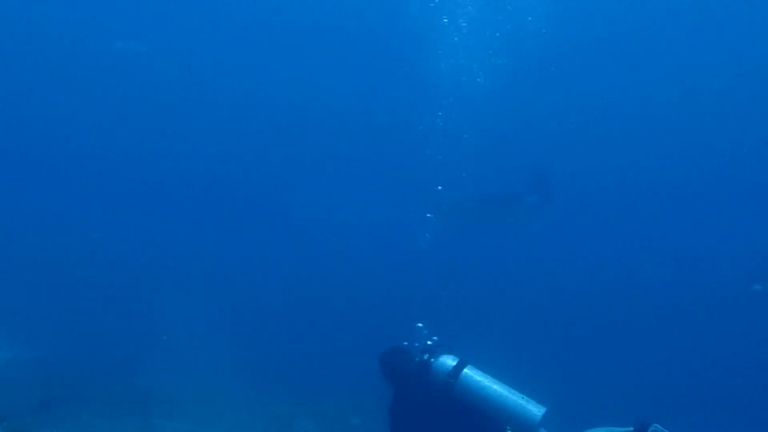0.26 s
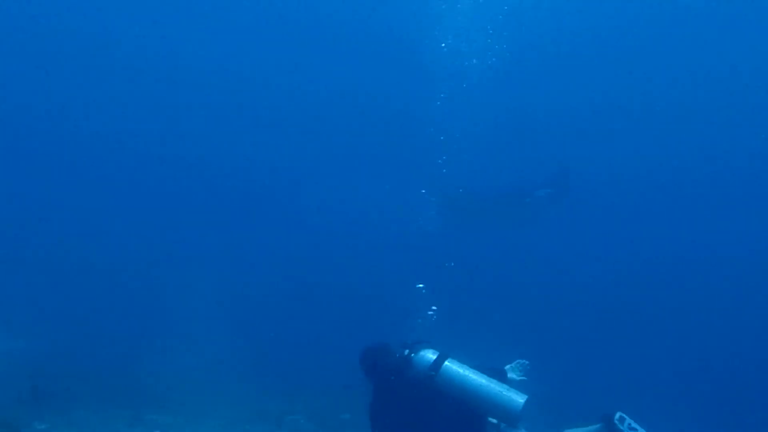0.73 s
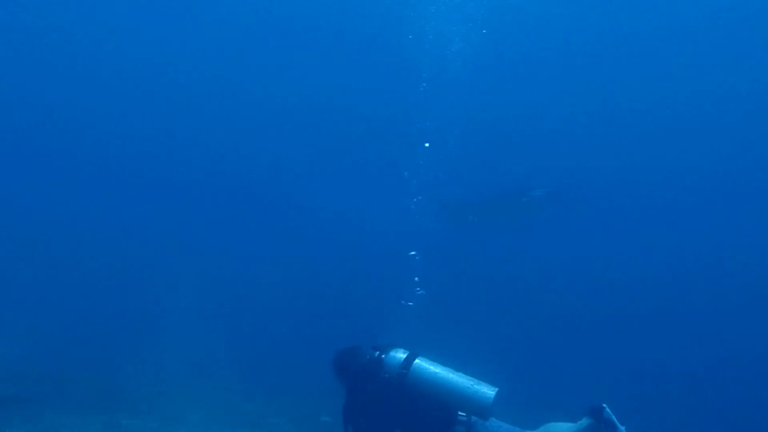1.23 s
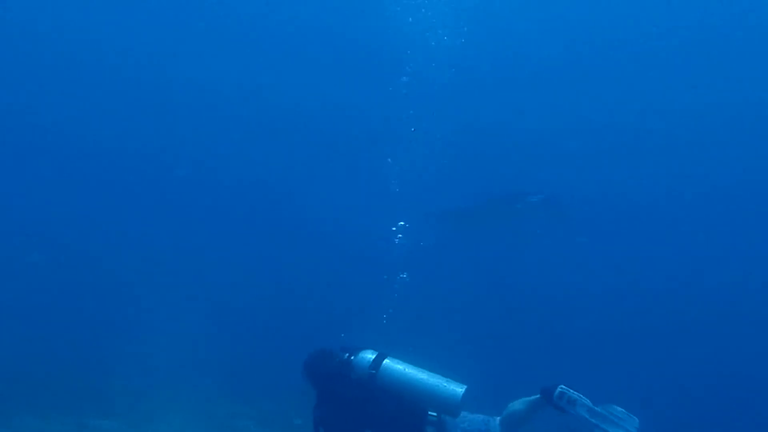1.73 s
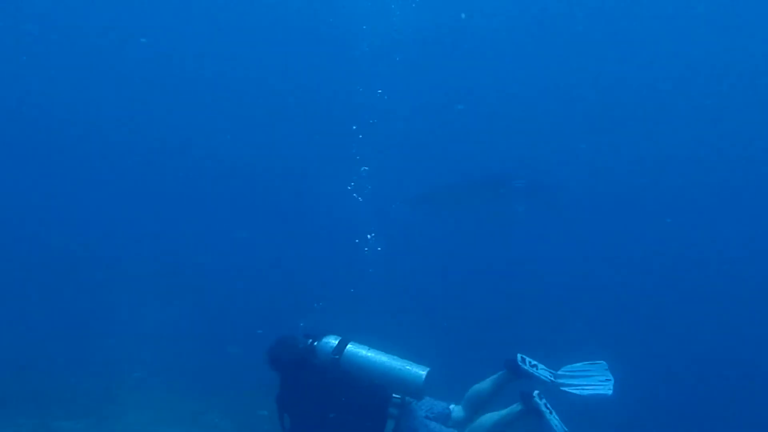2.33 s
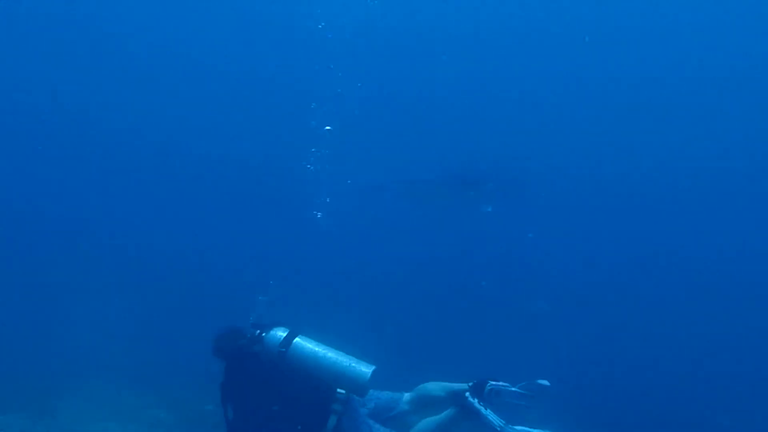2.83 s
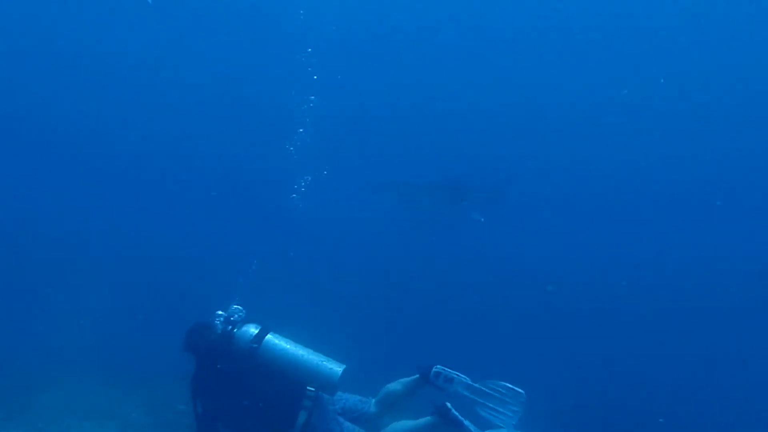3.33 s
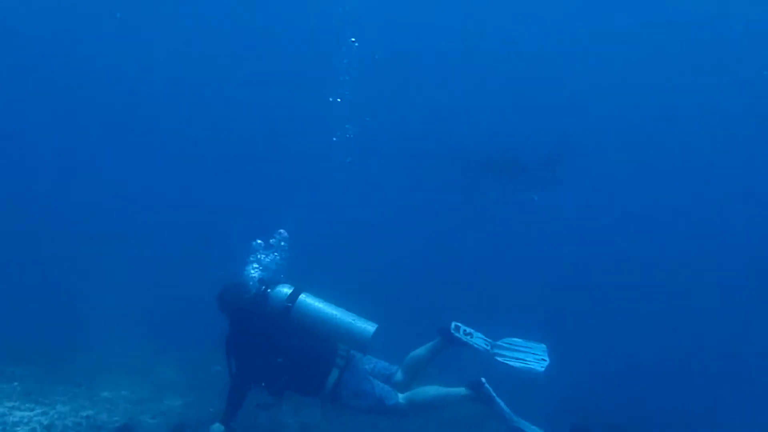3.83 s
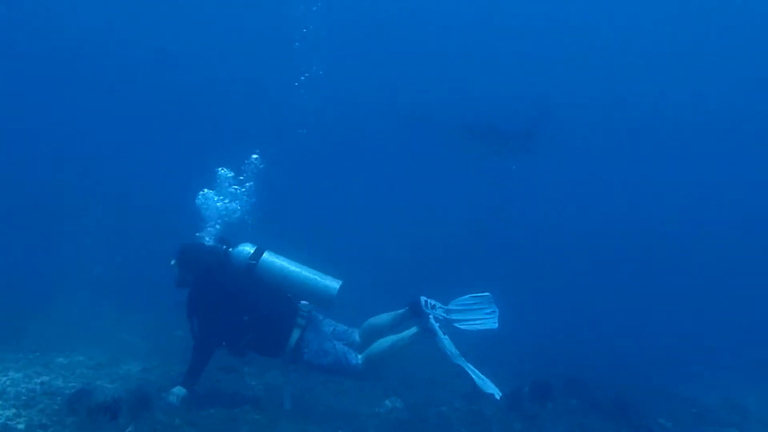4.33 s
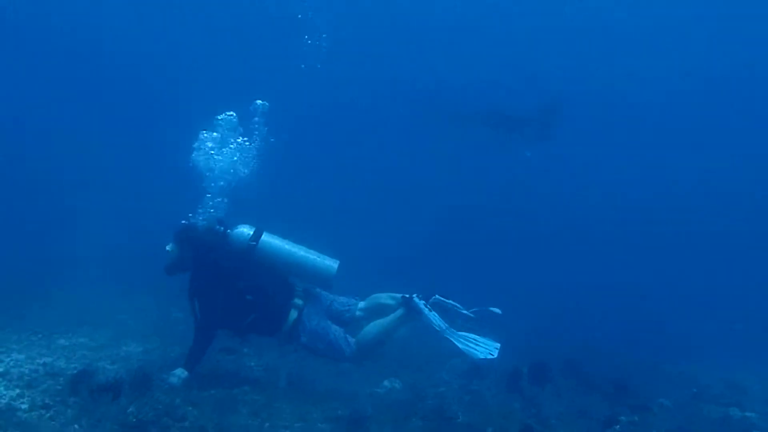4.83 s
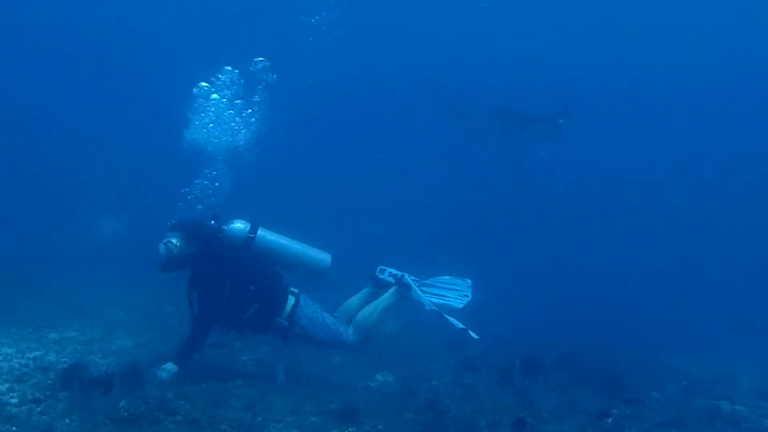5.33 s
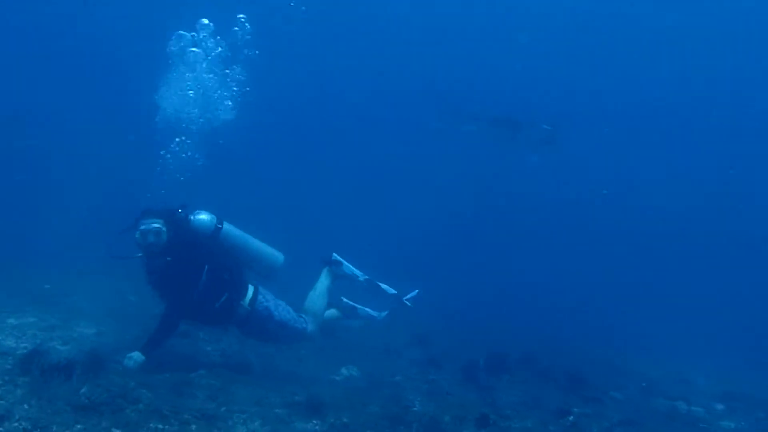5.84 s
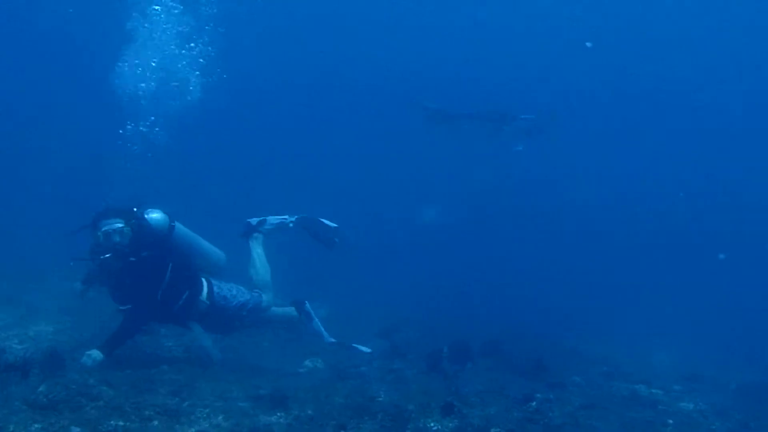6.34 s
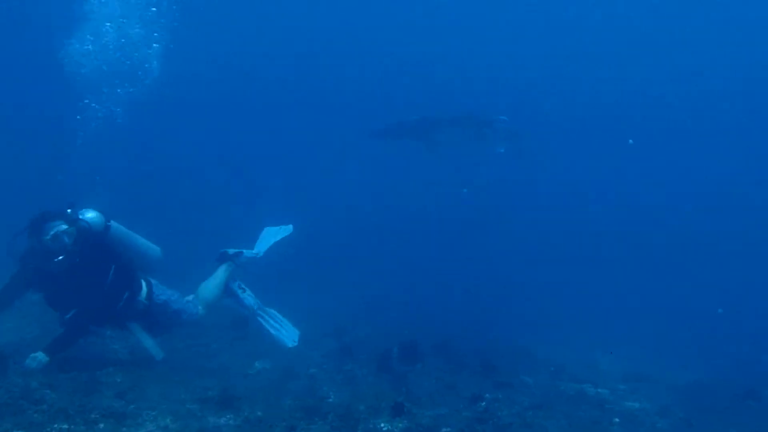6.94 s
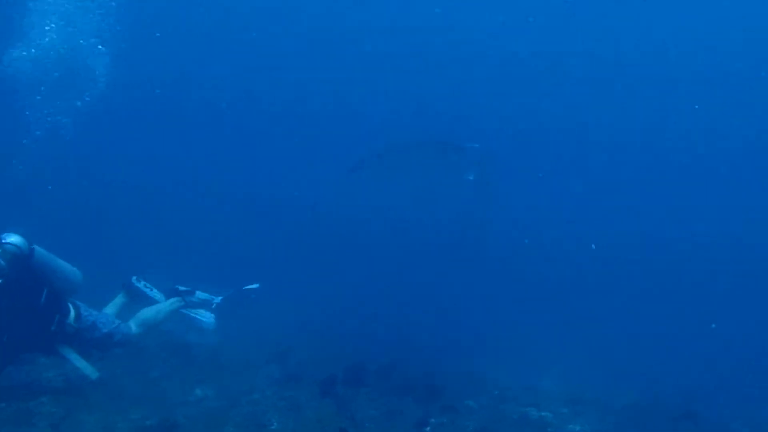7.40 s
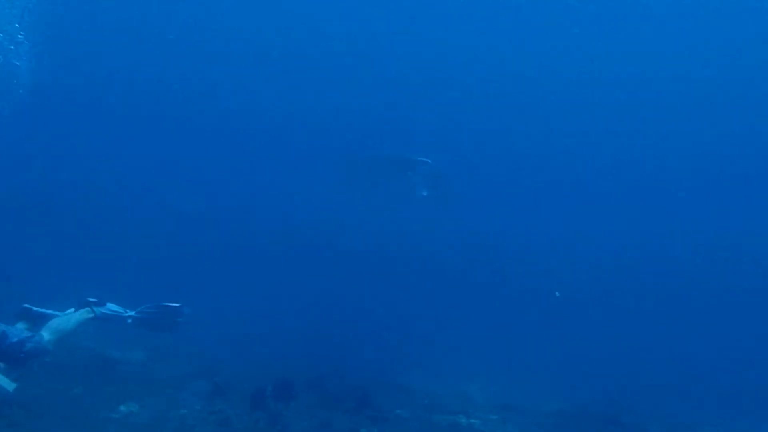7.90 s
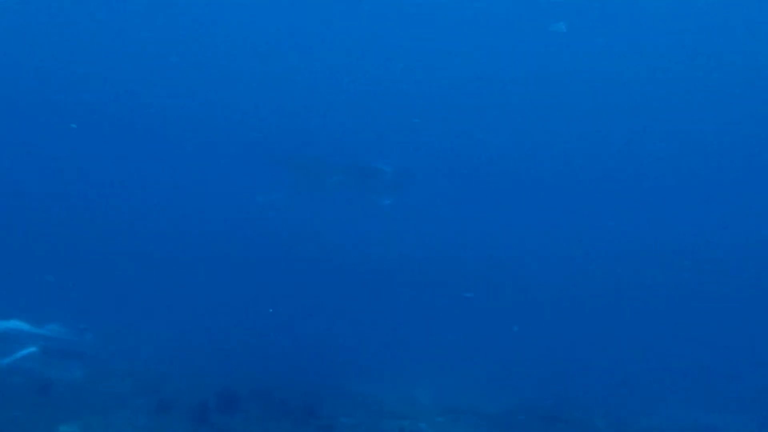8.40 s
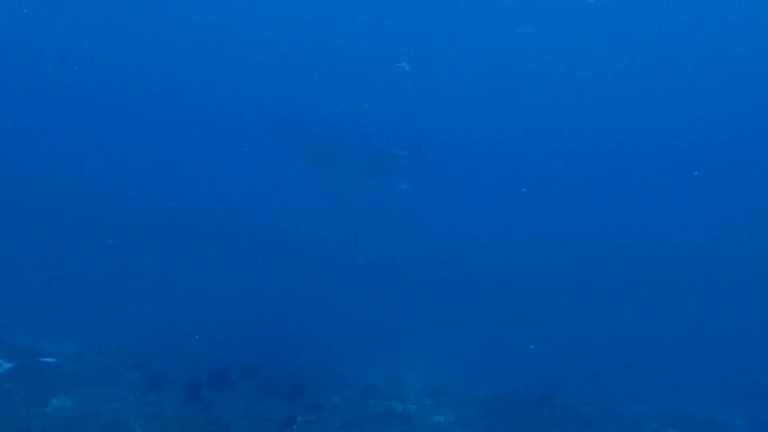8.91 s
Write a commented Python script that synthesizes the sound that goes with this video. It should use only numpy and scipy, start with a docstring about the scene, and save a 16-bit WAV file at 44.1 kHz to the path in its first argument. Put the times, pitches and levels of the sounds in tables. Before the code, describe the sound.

Underwater, a distant boat engine hums and churns, slowly fading, with faint crackling, a few bubble gulps and four dry knocks.

```python
"""A distant boat heard under water, through a camera's waterproof housing.
From the start its hum and churning rumble ring the housing, slowly fading as it draws away, while
snapping shrimp crackle all round and a few bubbles gulp. Two knocks hit the housing just after 2 s.
Near 6 s fine bubbles fizz, the engine sags and the propeller begins to throb and spit.
Two more knocks follow; the last, at 8 s, is the hardest and briefly ducks the level."""
import sys
import numpy as np
from scipy import signal
from scipy.fft import rfft, irfft
from scipy.io import wavfile
from scipy.ndimage import uniform_filter1d

SR = 44100
rng = np.random.default_rng(int(sys.argv[2]) if len(sys.argv) > 2 else 0)


def digitize_waveform(pressure):
    """Quantize a signal to 16-bit integers and store it at the path in sys.argv[1].

    Rows of a 2-D input are taken as channels; values are limited to [-1, 1].
    """
    field = np.atleast_2d(pressure).T
    bounded = np.clip(field, -1, 1)
    quanta = np.round(bounded * 32767).astype(np.int16)
    wavfile.write(sys.argv[1], SR, quanta)


N = 403956
T = np.arange(N) / SR
HZ = np.fft.rfftfreq(N, 1 / SR)
SIDE = np.array([[.5], [-.5]])  # splits a pan in dB between left and right

# Blade passes that bite harder than the rest. Each row: time in seconds, extra level in dB.
HARD_BEATS = [(6.585, 5), (6.708, -1), (7.203, 0), (7.387, 3.5), (7.449, 0.5), (7.634, -4), (7.696, 6.5)]


def boat(shell, throb_depth=0.28, rumble_beat=0.75, wash_beat=0.16, spit_db=-60, grit_db=-61.5):
    """Churning water rings the housing, in surges once the propeller beats."""
    depth, beat = throb_depth * throbbing(), blade_beat()
    rumble_pulse = np.sqrt(1 + rumble_beat * depth * (beat - 1))
    wash_pulse = np.sqrt(1 + wash_beat * depth * (beat - 1))
    churn = boat_gain("churn") * through_housing(noise(), shell, 18, 379)
    rumble = boat_gain("rumble") * through_housing(noise() * rumble_pulse, shell, 361, 754)
    wash = boat_gain("wash") * through_housing(pops(5000, 1.17) * wash_pulse, shell, 670, 1750)
    rush = boat_gain("rush") * through_housing(noise() * wash_pulse, shell, 1530, 2530)
    # Cavities shed by each blade collapse unevenly: small ones spit, larger ones sound gritty.
    small = pops(3000, 4.1) * depth ** 2 * np.sqrt(blade_beat(uneven_db=13.5))
    large = pops(5000, 1.2) * depth ** 2 * np.sqrt(blade_beat(uneven_db=7))
    spit = amp(spit_db) * through_housing(small, shell, 5200, 9500, order=6)
    grit = amp(grit_db) * through_housing(large, shell, 1800, 3300, order=6)
    return churn + rumble * flutter() + wash + rush + spit + grit


def boat_gain(part, doubled_s=0.34):
    """Fader for one layer of the boat: it falls with distance, swells twice and shifts with the throb."""
    # The boat's layers, by name. Each row: opening level in dB, then its change in dB
    # per doubling of distance, in a swell and once the propeller throbs.
    layers = {"churn": (-39, -.75, 0.5, -1.6), "rumble": (-28.5, -1.705, -1.4, 0.5),
              "wash": (-38, -1.92, 2, 0.83), "rush": (-56.5, -1, 6, -0.3),
              "low tone": (-47.5, -0.84, 0.5, -5), "upper tone": (-47.5, -1, 4.5, -18),
              "drone": (-37, -1.5, 4, -3)}
    # Swells along the boat's way. Each row: middle in seconds, half width in seconds.
    swells = [(2.5, 1), (9.15, 0.51)]
    first_db, doubling_db, swell_db, throb_db = layers[part]
    swell = sum(np.exp(-((T - middle) / width) ** 2) for middle, width in swells)
    doublings = np.log2(1 + T / doubled_s)
    return amp(first_db + doubling_db * doublings + swell_db * swell + throb_db * throbbing())


def throbbing(start_s=5.75, rise_s=0.49):
    """Ramps from zero to one as the propeller starts to throb."""
    return np.clip((T - start_s) / rise_s, 0, 1)


def blade_beat(blade_hz=16.2, beat_at_s=7.449, lead_s=0.0099, decay_s=0.0061, uneven_db=3):
    """A rounded surge at each blade pass, none quite like the last and a few much harder; mean one."""
    passes = (T - beat_at_s + lead_s) * blade_hz
    blade = (np.floor(passes) - np.floor(passes[0])).astype(int)
    age = (passes % 1) / blade_hz / decay_s
    strength_db = rng.uniform(-uneven_db, uneven_db, blade[-1] + 1)
    for s, extra_db in HARD_BEATS:
        strength_db[blade[round((s + .5 / blade_hz) * SR)]] = uneven_db + extra_db
    surge = age * np.exp(-age) * amp(strength_db)[blade]
    return surge / surge.mean()


def flutter(depth_db=1.4, top_hz=24):
    """The churning comes in short, irregular puffs; rms one."""
    lumps = unit_rms(irfft(rfft(rng.standard_normal(N)) * HZ / (1 + (HZ / top_hz) ** 4), N))
    return unit_rms(amp(depth_db * lumps))


def surges(hz=462, t60=0.084, rise_s=0.00552, beat_db=-30, count=6000):
    """A stronger push of water, or a hard blade pass, swells the housing's main resonance."""
    # The rumble's strongest pushes. Each row: start in seconds, peak level in dB.
    pushes = [(0.045, -19), (0.27, -21), (1.166, -24.5), (1.818, -26), (2.449, -21.5), (3.135, -24),
              (3.411, -25), (4.06, -23.5)]
    bites = [(s - rise_s, beat_db + extra_db) for s, extra_db in HARD_BEATS]
    out, t = np.zeros(N), np.arange(count) / SR
    for s, db in pushes + bites:
        swell = ring(hz * rng.uniform(0.99, 1.03), t60, rise_s, t)
        add(out, s, amp(db) * swell / abs(swell).max())
    return out


def engine_hum(low_hz=132, upper_hz=163, drone_hz=447.3, rise_s=0.075, release_s=0.16, pan_db=3):
    """A steady low engine tone, a blurred one above it and a drone near the housing's resonance."""
    # Spells when the low tone stands out. Each row: start in seconds, end in seconds, level in dB.
    spells = [(0.0, 0.292, -41), (3.72, 6.083, -45)]
    lift = sum(amp(db) * np.clip((T - start) / rise_s, 0, 1) * np.exp(-np.maximum(T - end, 0) / release_s)
               for start, end, db in spells)
    steady = engine_tone(low_hz, width_hz=3, waver=.3)
    blurred = engine_tone(upper_hz, width_hz=7.4, waver=2.7)
    drone = boat_gain("drone") * engine_tone(drone_hz, width_hz=3.9, waver=1)
    tones = np.hypot(boat_gain("low tone"), lift) * steady + boat_gain("upper tone") * blurred
    return tones * amp(pan_db * SIDE) + drone


def engine_tone(hz, width_hz, waver, creep_per_s=.002, sag=.026):
    """A tone that follows engine speed, its level and phase drifting through the water; rms one."""
    speed = 1 + creep_per_s * T - sag * throbbing()
    drift = np.fft.ifft(rfft(rng.standard_normal(N)) / (1 + (HZ / width_hz) ** 2), N)
    tone = np.exp(2j * np.pi * hz * np.cumsum(speed) / SR)
    return unit_rms(((1 + waver * drift / np.std(drift)) * tone).real)


def knocks(shell, rise_s=0.0022, pan_db=6, click_s=0.0026, click_band_hz=(2200, 6000), count=5000):
    """Dry knocks: the housing's modes, brighter for a sharper contact, and a small click."""
    # Hits on the housing. Each row: start in seconds, level in dB, click against body in dB,
    # brightness in dB per octave.
    hits = [(2.287, -19.5, -16, 6.5), (2.375, -20.5, -23, -2), (7.5703, -20.5, -20, 5),
            (8.0115, -8.5, -19.5, -2.5)]
    # The modes a hit rings. Each row: pitch in Hz, level in dB, seconds to die away by 60 dB.
    modes = [(919, -7.5, 0.082), (1046, 8, 0.023), (1122, 1, 0.034), (1570, -7, 0.03), (1954, -10.5, 0.022),
             (3230, -27, 0.029), (5500, -31, 0.032), (6000, -29, .03)]
    out, t = np.zeros(N), np.arange(count) / SR
    treble = signal.butter(3, click_band_hz, "band", fs=SR, output="sos")
    for s, db, click_db, tilt_db in hits:
        body = sum(amp(mode_db + tilt_db * np.log2(hz)) * ring(hz, t60, rise_s, t)
                   for hz, mode_db, t60 in modes)
        contact = rng.standard_normal(count) * t * np.exp(-t / click_s)
        click = signal.sosfilt(treble, signal.fftconvolve(contact, shell[0])[:count])
        add(out, s, amp(db) * (body / abs(body).max() + amp(click_db) * click / abs(click).max()))
    return out * amp(pan_db * SIDE)


def gulps(rise_s=0.0015, rise_share=0.022, glide=0.066, pan_db=3.5, count=20000):
    """Large bubbles ring low and rise a little in pitch; long rings start more softly."""
    # Each row: start in seconds, level in dB, opening pitch in Hz, seconds to die away by 60 dB.
    bubbles = [(0, -25, 223.5, 0.43), (0.847, -28, 338, 0.079), (0.874, -26, 229, 0.072),
               (.893, -24, 310, 0.049), (2.527, -17.5, 255, 0.019), (4.446, -33, 273, 0.047),
               (5.66, -32.5, 525, 0.68)]
    out, t = np.zeros(N), np.arange(count) / SR
    for s, db, hz, t60 in bubbles:
        rising_hz = hz * (1 + glide * np.minimum(t / t60, 1))
        bubble = ring(rising_hz, t60, rise_s + rise_share * t60, t)
        add(out, s, amp(db) * bubble / abs(bubble).max())
    return out * amp(pan_db * SIDE)


def bubble_clouds(shell, low_hz=110, top_hz=380):
    """Clouds of bubbles burble briefly around the louder gulps."""
    # Each row: middle of the burble in seconds, half width in seconds, level in dB.
    burbles = [(0.89, .055, -35), (2.53, 0.023, -48)]
    level = sum(amp(db) * np.exp(-((T - s) / width) ** 2) for s, width, db in burbles)
    return level * through_housing(noise(), shell, low_hz, top_hz)


def ticks(high_hz=7950, low_hz=2850, rise_s=0.0029, click_db=-17, click_s=0.00083, pan_db=2, count=2000):
    """Tiny bright pings close by: a brief click, a rough high ring and a fainter low one."""
    # Each row: start of the ping in seconds, level in dB, low ring against high ring in dB.
    pings = [(0.191, -41, -42), (2.534, -42, -27), (2.732, -29, -32), (4.313, -27, -13.5),
             (7.633, -41, -27)]
    out, t = np.zeros(N), np.arange(count) / SR
    for s, db, low_db in pings:
        roughness = 1 + 0.34 * unit_rms(uniform_filter1d(rng.standard_normal(count), 30))
        ping = ring(high_hz, 0.016, rise_s, t) * roughness + amp(low_db) * ring(low_hz, 0.024, rise_s, t)
        click = np.diff(rng.standard_normal(count + 1)) * np.exp(-t / click_s)
        add(out, s, amp(db) * (ping / abs(ping).max() + amp(click_db) * click))
    return out * amp(pan_db * SIDE)


def shrimp_snaps(shell, decay_s=0.007, count=600):
    """Each near snap arrives as a short cluster of reflections."""
    # The loudest snaps. Each row: time in seconds, level in dB before the housing colours it.
    snaps = [(1.6296, -47), (3.4121, -44), (5.4358, -42), (5.886, -47), (6.155, -46), (8.4161, -40),
             (8.4892, -42), (8.521, -42), (8.561, -40.5), (8.585, -38)]
    bursts, t = np.zeros((2, N)), np.arange(count) / SR
    for s, db in snaps:
        add(bursts, s - .001, amp(db) * rng.standard_normal((2, count)) * np.exp(-t / decay_s))
    return through_housing(bursts, shell, 2300, 11000) * np.sqrt(np.mean(bursts ** 2))


def shrimp_bed(shell, hiss_db=-49.5, crackle_db=-59, sizzle_db=-60, fade_db=-3, sizzle_fade_db=-2):
    """Far shrimp merge into a hiss and nearer ones crackle; the whole bed slowly eases off."""
    hiss = amp(hiss_db) * through_housing(noise(), shell, 4630, SR / 2)
    crackle = amp(crackle_db) * through_housing(pops(700, 6.6), shell, 5000, SR / 2)
    sizzle = amp(sizzle_db) * through_housing(pops(9000, 1), shell, 1970, 4440)
    progress = T / T[-1]
    return (hiss + crackle + sizzle * amp(sizzle_fade_db * progress)) * amp(fade_db * (progress - .5))


def fizz(shell, middle_s=6, half_width_s=1, fizz_db=-55):
    """A plume of fine bubbles fizzes faintly as it rises."""
    level = amp(fizz_db) * np.exp(-((T - middle_s) / half_width_s) ** 2)
    return level * through_housing(pops(2500, 4.9), shell, 5000, 7000, order=6)


def housing_response(wall_pan_db=3, size=8192):
    """The housing's colour: an impulse response from the water to each microphone."""
    # Its resonances. Each row: centre in Hz, width in Hz, level in dB, left over right in dB.
    resonances = [(166.7, 7.2, -17, 21), (458.7, 67, -1, 1.5), (476, 40, -10, -12.5), (502, 279, -17, 10.5),
                  (878, 85, -19.5, 9.5), (1093.5, 127, -11, 6), (1190.4, 65, -11, 6.5),
                  (1398, 168, -16.5, 3.5), (1653, 184, -31.5, 8), (1941, 84, -22, 5.5),
                  (2074, 160, -31.5, -1), (2816, 760, -33, 4), (3550, 166, -33, 1), (4453, 300, -35, 6.5),
                  (5370, 276, -26, 13), (5720, 350, -30, -3.5), (6114, 83, -25, -1), (6660, 154, -32, 13),
                  (7900, 850, -31.5, 0.2), (9520, 330, -39, 2), (11300, 430, -39, -3)]
    # What the wall lets through between them. Each row: frequency in Hz, level in dB.
    wall = [(25, -39), (60, -27), (110, -22), (150, -14), (280, -18.5), (380, -15.5), (700, -30),
            (1000, -22), (2300, -57), (4800, -40), (5600, -33.5), (8500, -39.5), (12000, -41.5),
            (15700, -41.5)]
    # Dips where neighbouring modes cancel. Each row: centre in Hz, width in Hz, depth in dB.
    notches = [(4740, 105, -17), (3510, 79, -9.5), (1870, 140, -1), (1018, 21, -9.5)]
    hz = np.fft.rfftfreq(size, 1 / SR)
    power = amp(curve(wall, hz) + SIDE * wall_pan_db) ** 2
    for centre, width, db, pan_db in resonances:
        power += (amp(db + SIDE * pan_db) / (1 + (2 * (hz - centre) / width) ** 2)) ** 2
    for centre, width, db in notches:
        power *= amp(db / (1 + (2 * (hz - centre) / width) ** 2)) ** 2
    # Minimum phase, so the ringing follows each hit.
    cepstrum = irfft(np.log(power))[:, :size // 2]
    cepstrum[:, 0] /= 2
    return irfft(np.exp(rfft(cepstrum, size)))[:, :size // 2]


def through_housing(pair, shell, lo_hz, hi_hz, order=12):
    """A band of two pressure signals, partly shared by the microphones, rings the housing; rms one."""
    # How alike the two microphones sound. Each row: frequency in Hz, likeness from 0 to 1.
    likeness = [(25, 0.9), (85, 0.53), (130, 0.97), (550, 0.99), (700, 0.98), (1200, 1), (1900, 0.57),
                (3200, 0.83), (4500, 0.64), (6000, 0.53), (9000, 0.2), (15000, 0)]
    # One wall mode reaches the left microphone first. Each row: frequency in Hz, lead in radians.
    lead = [(460, 0), (570, 0), (630, 1), (670, 0.37)]
    left, other = rfft(pair)
    same = curve(likeness, HZ)
    right = (same * left + np.sqrt(1 - same ** 2) * other) * np.exp(-1j * curve(lead, HZ))
    band = 1 / np.sqrt((1 + (lo_hz / (HZ + 1)) ** (2 * order)) * (1 + (HZ / hi_hz) ** (2 * order)))
    return unit_rms(irfft(np.array([left, right]) * band * rfft(shell, N), N))


def pops(per_s, spread_db):
    """Sparse collapses of tiny cavities: many faint, a few strong."""
    size = amp(spread_db * np.minimum(rng.exponential(1, N), 4))
    return noise() * size * (rng.random(N) < per_s / SR)


def ring(hz, t60, rise_s, t):
    """A mode that swells briefly and dies away."""
    return np.sin(2 * np.pi * hz * t) * amp(-60 * t / t60) * (1 - np.exp(-(t / rise_s) ** 2))


def noise():
    """Two unrelated white noises."""
    return rng.standard_normal((2, N))


def amp(db):
    """Decibels to gain."""
    return 10 ** (np.asarray(db) / 20)


def unit_rms(x):
    """Scales to an rms of one."""
    return x / np.sqrt(np.mean(x ** 2) + 1e-20)


def curve(points, hz):
    """Joins points up on a log-frequency axis."""
    f, value = np.transpose(points)
    return np.interp(np.log(hz + 1), np.log(f + 1), value)


def add(mix, s, sound):
    """Mixes a sound in at s seconds."""
    part = mix[..., max(round(s * SR), 0):][..., :sound.shape[-1]]
    part += sound[..., :part.shape[-1]]


def scene():
    """The stereo mix of everything in the water and on the housing."""
    shell = housing_response()
    vessel = boat(shell) + surges() + engine_hum()
    shrimp = shrimp_bed(shell) + shrimp_snaps(shell)
    return vessel + shrimp + knocks(shell) + ticks() + gulps() + bubble_clouds(shell) + fizz(shell)


def record(dry, threshold_db=-21, slope=0.96, recover_db_per_s=18, smooth_samples=200, top_hz=15720):
    """The camera's gain control ducks just after the hardest knock; a low-pass trims the top end."""
    pole = np.exp(-1 / smooth_samples)
    power_db = 10 * np.log10(signal.lfilter([1 - pole], [1, -pole], (dry ** 2).mean(0)) + 1e-12)
    fall = T * recover_db_per_s
    held_db = np.maximum.accumulate(power_db + fall) - fall
    over_db = np.maximum(held_db - threshold_db, 0)
    ducked = dry / amp(slope * signal.lfilter([1 - pole], [1, -pole], over_db))
    lowpass = signal.firwin(1023, top_hz, window=("kaiser", 9), fs=SR)
    return signal.oaconvolve(ducked, lowpass[None], "same", axes=1)


dry = scene()
out = record(dry)
digitize_waveform(out)
```